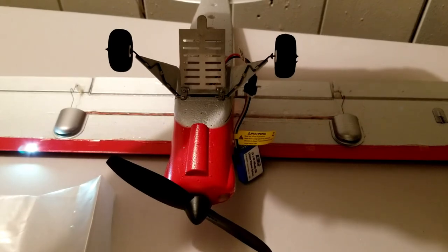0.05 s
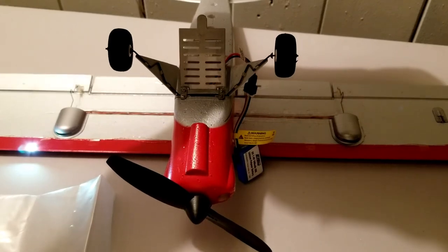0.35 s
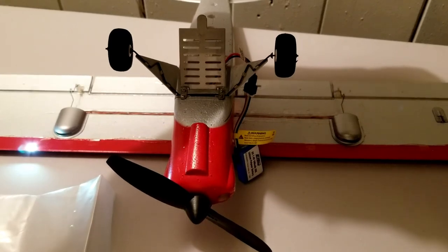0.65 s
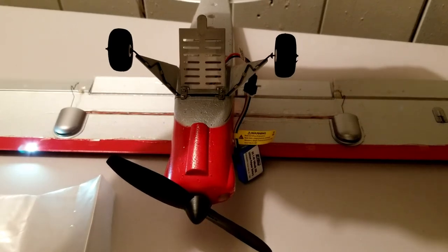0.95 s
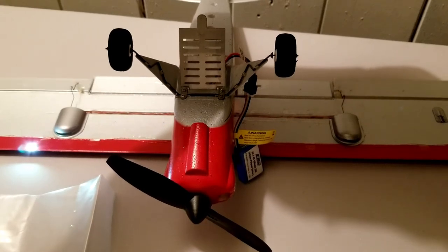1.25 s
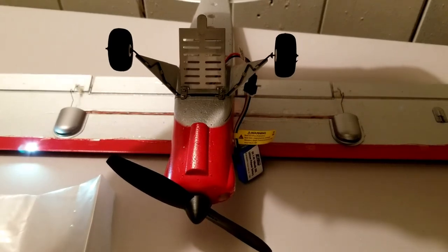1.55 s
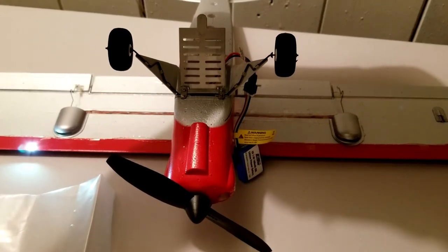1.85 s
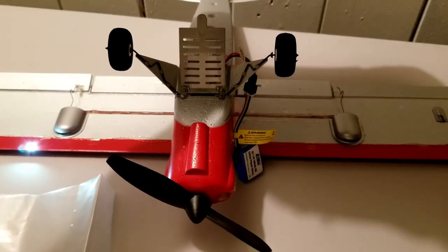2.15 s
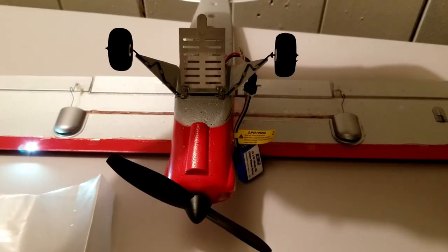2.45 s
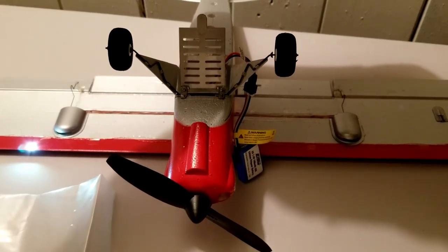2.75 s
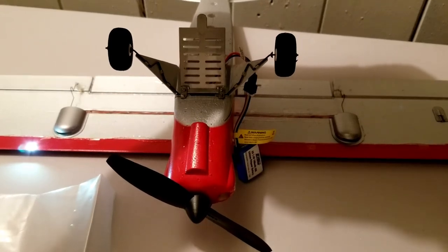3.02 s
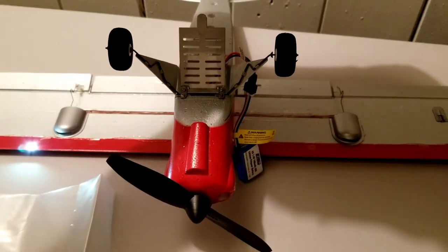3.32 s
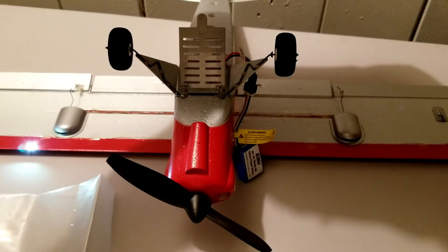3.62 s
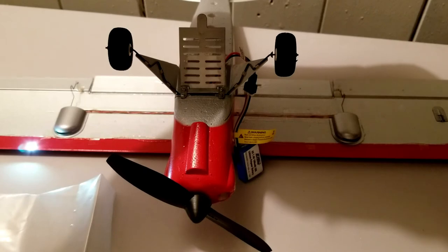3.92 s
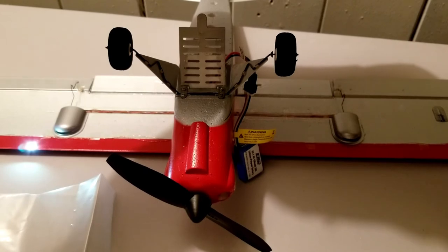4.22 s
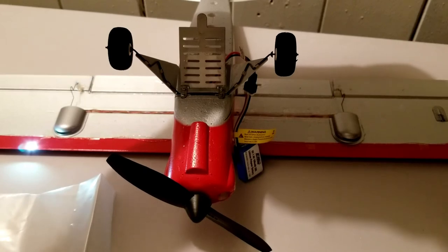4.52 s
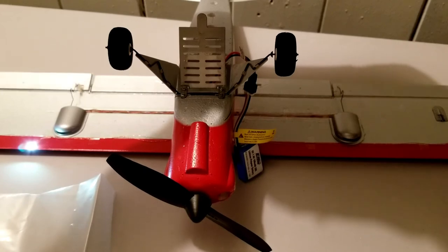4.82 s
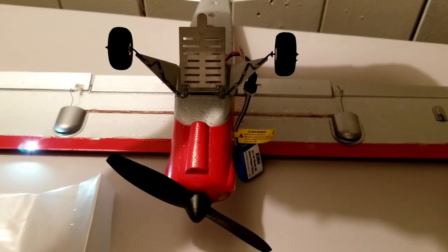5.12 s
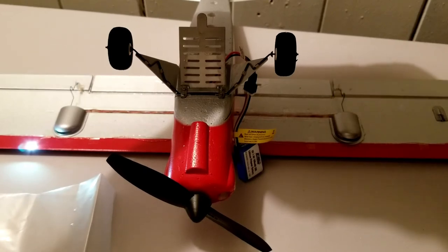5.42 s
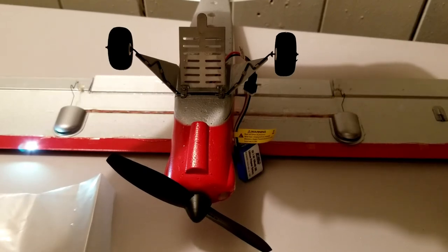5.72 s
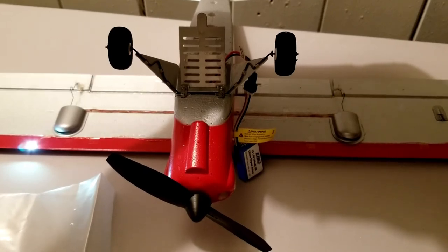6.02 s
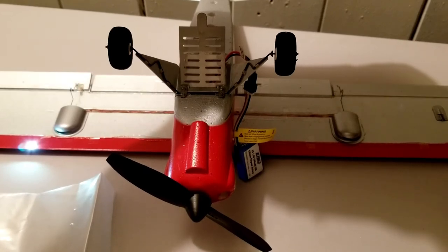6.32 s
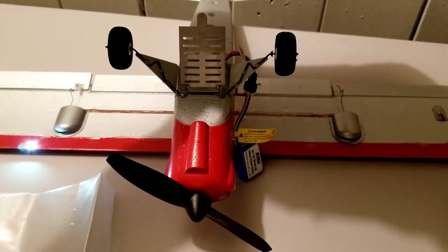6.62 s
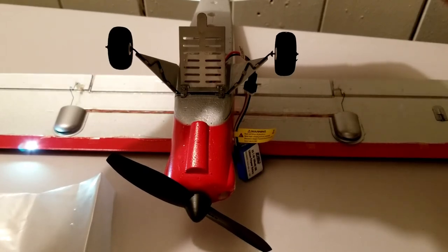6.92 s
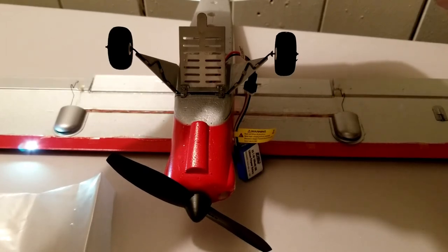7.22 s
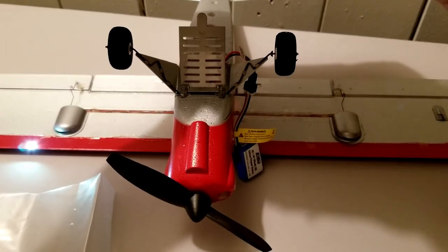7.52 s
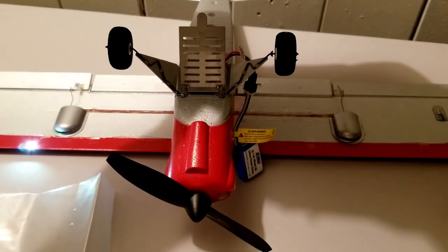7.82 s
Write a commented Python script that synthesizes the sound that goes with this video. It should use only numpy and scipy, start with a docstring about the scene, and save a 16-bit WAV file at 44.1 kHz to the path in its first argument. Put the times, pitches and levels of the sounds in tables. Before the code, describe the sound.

Small servos whirr and rattle on and off close by, moving a foam model plane's flaps back and forth indoors.

```python
"""Servos on a foam model plane

Tiny motors (servos) swing the plane's flaps to and fro, close to a phone in a small quiet room.
The radio receiver kicks each motor once per beat, or control frame: slow moves stutter, fast ones
merge into a buzz of plastic teeth. Each stroke speeds up, peaks and eases off; the brighter left servo
often leads. Loose gears and links clack in hard moves, and the foam wing hums with the motors."""
import sys
import numpy as np
from scipy import signal
from scipy.fft import rfft, irfft
from scipy.io import wavfile
from scipy.ndimage import uniform_filter1d

SR = 44100
rng = np.random.default_rng(int(sys.argv[2]) if len(sys.argv) > 2 else 0)


def waveform_to_disk(signal):
    """Save audio, clipped to [-1, 1], as 16-bit WAV at the path in sys.argv[1]."""
    frames = np.transpose(np.atleast_2d(signal))
    scaled = np.clip(frames, -1, 1) * 32767
    samples = np.round(scaled).astype(np.int16)
    wavfile.write(sys.argv[1], SR, samples)


N = 355047
TIME = np.arange(N) / SR
FRAME_HZ = 44.391  # control frames a second
TOP_HZ = 15900  # the phone cuts the sound above this
PAD_SAMPLES = SR // 1000  # spare time ahead of an echo pattern, to keep its start whole

# Swings of the flaps. Columns: start t/s, fastest t/s, gear level/dB, swell before the peak/dB,
# fade after it/dB, wing rumble level/dB, treble lift/dB, lead of the left servo/dB
STROKES = [(-.1, 0.008, -28.5, 1, 2, -47, 2, 3), (0.119, 0.189, -26, 2, 6, -47, -1, -1),
           (0.434, 0.496, -23.5, 4, 7, -46, -3, 2), (0.68, .80, -26.5, 2, 3, -46, -1, 0.5),
           (1.153, 1.292, -26.5, 4.5, 5.5, -47.5, -0.5, 2.5), (2.168, 2.37, -24, 4, 8, -46, -3.5, 2.5),
           (2.879, 3.11, -25.5, 7, 9, -44.5, -3, 1.5), (3.563, 3.681, -22, 11, 13, -46, -1.5, 0),
           (4.351, 4.524, -28, 4.5, 7, -47.5, -1, 2), (5.077, 5.2, -24, 4, 7, -47.5, -2, -0.5),
           (5.302, 5.37, -29, 2, 4, -52.5, -1, 0.5), (5.802, 5.991, -27, 6, 10, -47, -2.5, 2.5),
           (6.542, 6.68, -26.5, 6, 10, -50.5, -2.5, -1.5), (6.918, 7.06, -31.5, 4, 4, -58, -3.5, 1.5),
           (7.326, 7.442, -27.5, 6, 3.5, -47.5, 1, 2), (7.569, 7.73, -28.5, 1, 4.5, -50.5, -3, -1),
           (8.001, 8.042, -27, 1.5, 0, -60, -6.5, -0.5)]
# Runs of kicks as a servo creeps or settles.
# Columns: first t/s, number of kicks, frames apart, level/dB, change per kick/dB
CREEPS = [(.911, 2, 4, -28, -10), (1.113, 2, 1, -29, -3), (1.795, 2, 1, -27.5, -4), (1.990, 2, 4, -41, 10),
          (2.11, 2, 2, -26.5, -4), (2.823, 3, 1, -38.5, 4), (3.323, 2, 2, -33, -1),
          (3.928, 4, 1, -29.5, -3.5), (4.128, 2, 1, -36.5, -1.5), (4.197, 4, 1, -36.5, 0.18),
          (4.311, 2, 2, -35, 3), (4.812, 5, 1, -35, 1), (5.012, 3, 1, -36, -1), (5.55, 2, 2, -28.5, -6),
          (5.726, 4, 1, -43, 4), (6.498, 2, 1, -37, 0), (7.301, 1, 1, -47, 0), (7.332, 1, 1, -27.5, 0),
          (7.872, 2, 1, -28, -3.5), (7.944, 2, 3, -34.5, 9.5)]
# Pitches at which the servo cases and their mounts ring. Columns: f/Hz, width/Hz, lift/dB
CASE_RESONANCES = [(3210, 170, 3.5), (4730, 230, 1.5), (7750, 370, 2.3), (14200, 1100, 3)]


def gears(drive, treble_db, rumble_db, whirr_db, servos=4):
    """The servos take turns to be loudest, each one's teeth ringing its own part of the plane."""
    # Tone of the plastic gears. Columns: f/Hz, level/dB
    gear_colour = [(300, -37.5), (1000, -22), (1170, -12.5), (1750, -11), (2300, -7.5), (3200, -3.5),
                   (4400, 0.5), (5600, -0.5), (8000, -1.5), (9000, -4.5), (11300, -3), (12500, -3.5),
                   (15700, -5)]
    speed = motor_speed(drive)
    tooth_hz = 2300 * np.clip(speed / .03, .1, 2) ** .5
    shares = np.array([undb(9.1 * drift(12)) for _ in range(servos)])
    shares /= np.sqrt(np.sum(shares ** 2, axis=0))
    buzz = sum(radiate(share * speed * teeth(tooth_hz, scatter_db=11, rub=0.99),
                       ring_s=0.026, snap=0.57, width=5.7, left_db=3) for share in shares)
    buzz = colour(buzz, gear_colour, CASE_RESONANCES)
    buzz += radiate(undb(whirr_db) * whirr(speed), ring_s=0.0064, snap=1, width=0.87, left_db=3)
    # teeth that hit harder are brighter; a creeping motor hardly shakes the foam and sounds thin
    body_db = np.clip(0.28 * (rumble_db + 51.5), -8.5, 1.5)
    body = buzz - treble_of(buzz, 1700)
    return buzz + treble_of(buzz, 10100) * (undb(treble_db) - 1) + body * (undb(body_db) - 1)


def motor_speed(drive):
    """Each frame kicks the motors; the slower the move, the more speed they lose between kicks."""
    rise_s, coast_s = .0055, .007
    frame = TIME * FRAME_HZ - .4 + .05 * drift(30)
    drive_db = 20 * np.log10(drive + 1e-6)
    stutter_db = np.clip(2.6 - .3 * (drive_db + 31), 1.4, 6)
    speed = drive * undb(stutter_db * np.cos(2 * np.pi * frame) + 1.1 * drift(70) - 1.5)
    for at_s, db in on_frames(CREEPS):
        span = slice(max(0, int((at_s - .02) * SR)), int((at_s + .04) * SR))
        t = TIME[span] - at_s
        spin_up = np.clip(1 + t / rise_s, 0, 1) ** .9
        coast = np.exp(-np.abs(t / coast_s) ** 1.3)
        speed[span] = np.maximum(speed[span], undb(db) * np.where(t < 0, spin_up, coast))
    return speed


def teeth(tooth_hz, scatter_db, rub):
    """Gear teeth tick unevenly as they meet and hiss as their sides rub."""
    teeth_passed = np.cumsum(tooth_hz * (1 + .15 * drift(300))) / SR
    strength = undb(scatter_db * np.clip(rng.standard_normal(N), -2, 2))
    ticks = np.diff(np.floor(teeth_passed), prepend=0) * strength
    ticks /= np.sqrt(tooth_hz)  # slow teeth strike singly, fast ones share the load
    return unit(unit(ticks) + rub * rng.standard_normal(N))


def whirr(speed):
    """The small gear on the motor sings a rough, wandering tone that rises with speed."""
    wander = 1 + .035 * drift(25) + .02 * drift(700)
    pitch_hz = 4650 * np.clip(speed / .03, .3, 2) ** .08 * wander
    return speed * unit(undb(4 * drift(40)) * np.sin(2 * np.pi * np.cumsum(pitch_hz) / SR))


def strokes():
    """Each stroke swells, then fades and dulls. Gives on/off, gear level, treble lift and rumble level."""
    # Moments when the motors stop; other strokes run straight into the next. Column: t/s
    stops = [.38, .89, 1.755, 2.575, 3.25, 3.93, 4.82, 5.525, 6.288, 7.178, 7.858, 8.2]
    rows, stops = np.array(STROKES), np.array(stops)
    starts = rows[:, 0]
    next_stops = stops[np.searchsorted(stops, rows[:, 1])]
    ends = np.minimum(next_stops, np.append(starts[1:], stops[-1]))
    current = np.maximum(np.searchsorted(starts, TIME) - 1, 0)
    start, fastest, peak_db, swell_db, fade_db, wing_db, bright_db, _ = rows[current].T
    to_come = np.clip((fastest - TIME) / (fastest - start), 0, 1)
    ease = np.clip((TIME - fastest) / (ends[current] - fastest), 0, 1)
    moving = np.clip(uniform_filter1d((TIME <= ends[current]) * 1., size=300), 0, 1)
    gear_db = peak_db - swell_db * to_come - fade_db * ease ** .7  # falls fastest just after the peak
    treble_db = bright_db - 6.5 * ease
    rumble_db = wing_db - 3.6 * swell_db * to_come ** 2 - 13 * ease
    return moving, gear_db, treble_db, rumble_db


def left_lead(lead_s=.2):
    """How far the left servo leads around the start of each stroke, in dB."""
    return sum(lead_db * np.exp(-((TIME - start) / lead_s) ** 2) for start, *_, lead_db in STROKES)


def stray_clacks(drive, per_second=20):
    """Times and levels of clacks that come at random while the gears turn, louder with more effort."""
    draws = rng.random((round(per_second * N / SR), 2))
    samples = (draws[:, 0] * N).astype(int)
    return [(TIME[i], 20 * np.log10(drive[i]) + 2 + extra_db)
            for i, extra_db in zip(samples, draws[:, 1]) if drive[i] > .01]


def slack_clacks(drive, links=3):
    """Loose gears and links snap tight with a sharp tick; the teeth chatter briefly around it."""
    # Runs of clacks. Columns: first t/s, number of clacks, frames apart, level/dB, change per clack/dB
    rattles = [(.134, 3, 2, -15, -3), (.468, 3, 1, -15, 0), (.558, 2, 1, -19, 4), (.954, 1, 1, -21, 0),
               (2.181, 7, 1, -13.5, -.4), (2.338, 3, 1, -12.5, -1.5), (3.072, 4, 2, -13, -2.5),
               (3.577, 1, 1, -20, 0), (3.624, 3, 1, -13.5, 1.5), (3.688, 3, 1, -11.5, -3),
               (4.544, 2, 2, -20, 0), (5.086, 4, 1, -15, -.3), (5.178, 3, 1, -13, -1),
               (5.994, 3, 2, -16, .4), (6.552, 4, 3, -19, 0), (7.611, 2, 6, -18, -2), (8.035, 1, 1, -15, 0)]
    # Tone of a clack. Columns: f/Hz, level/dB
    clack_colour = [(300, -29), (980, -26), (1250, -9.5), (2200, -11), (3200, -2), (8000, 5), (9800, 3),
                    (15700, 1.5)]
    # the first kick of a creep takes up the slack with a faint tick
    take_ups = [(first_s - .003, min(db, -33)) for first_s, _, _, db, _ in CREEPS]
    forces = np.zeros((links, N + SR))
    for k, (at_s, db) in enumerate(on_frames(rattles) + take_ups + stray_clacks(drive)):
        at_s = max(at_s + .0008 * rng.standard_normal(), .01)  # a little early or late
        offsets, sizes = rng.standard_normal((2, 14))
        offsets[0], sizes[0] = 0, 2.5  # the main tick
        sizes *= undb(db) * np.sqrt(0.0021 * SR / np.sum(sizes ** 2))
        ticks_s = at_s - .0004 + .0013 * offsets
        np.add.at(forces[k % links], (ticks_s * SR).astype(int), sizes)
    knocks = sum(radiate(force[:N], ring_s=0.018, snap=0.75, width=2, left_db=2.2) for force in forces)
    return colour(knocks, clack_colour, CASE_RESONANCES)


def wing_rumble(strength, panels=3):
    """The motors shake the foam panels into a rough rumble."""
    # Tone of the foam wing. Columns: f/Hz, level/dB
    wing_colour = [(40, -25.5), (110, -13), (155, -5.5), (215, -14.5), (275, -5.5), (335, -8), (410, -4.5),
                   (520, -5), (640, -5.5), (1100, -12.5), (2000, -14.5)]
    shake = sum(radiate(strength * undb(1.5 * drift(40)) * rng.standard_normal(N),
                        ring_s=0.024, snap=1, width=1, left_db=2) for _ in range(panels))
    return undb(-7.5) * colour(shake, wing_colour)


def shaft_whine():
    """At full speed a motor's shaft makes the wing hum with a wavering tone that sags in pitch."""
    # Moments of full speed. Columns: middle t/s, shaft f/Hz, level/dB, half length/s
    whines = [(0.216, 626, -56.5, 0.047), (.77, 495, -49.5, 0.047), (1.287, 676.6, -49, 0.02),
              (2.42, 623, -49.5, 0.025), (3.086, 683.7, -43.5, 0.057), (3.683, 673.3, -45.5, 0.031),
              (5.195, 636.4, -51, 0.022), (6.052, 641, -47.5, 0.065), (7.445, 512, -49, 0.032)]
    sag_per_s, surge_db = 0.393, 7
    waver = 1 + .04 * drift(120)
    flutter = undb(3 * drift(100))
    surge = undb(surge_db * (np.cos(np.pi * (TIME * FRAME_HZ - .2)) - .5))  # on every second frame
    tone = np.zeros(N)
    for at_s, hz, db, half_s in whines:
        span = slice(max(0, int((at_s - .2) * SR)), int((at_s + .2) * SR))
        t = TIME[span] - at_s
        turns = np.cumsum(hz * waver[span] * (1 - sag_per_s * t)) / SR
        swell = undb(db) * np.exp(-(t / half_s) ** 2)
        tone[span] += swell * flutter[span] * surge[span] * np.sin(2 * np.pi * turns)
    return radiate(tone, ring_s=0.0024, snap=4.8, width=0.66, left_db=4.5)


def radiate(x, ring_s, snap, width, left_db):
    """A sound rings the plane's body, then the room, and reaches two microphones. Snap is its dry part."""
    echo_s, treble_echo_s, room_db = .36, .255, -8.5  # the times are for a fade of 60 dB
    t = TIME[:SR // 2]
    ring = rng.standard_normal((3, len(t))) * undb(-60 * t / ring_s)
    ring /= np.sqrt(np.sum(ring ** 2, axis=1, keepdims=True))
    ring[0, 0] += snap
    direct = flatten(ring[0] + width * ring[1:])
    # the walls answer a few milliseconds later and swallow the treble first
    walls = rng.standard_normal((2, len(t)))
    high = treble_of(walls, 3100)
    echo = (walls - high) * undb(-60 * t / echo_s) + high * undb(-60 * t / treble_echo_s)
    echo *= np.clip(t / 0.005, 0, 1)
    response = direct + undb(room_db) * flatten(echo)
    heard = signal.fftconvolve(x[None], response, axes=1)[:, PAD_SAMPLES:N + PAD_SAMPLES]
    return heard * undb([[left_db], [-left_db]])


def room_hum():
    """The faint low hum of a quiet room."""
    # Tone of the room's noise. Columns: f/Hz, level/dB
    air_colour = [(25, -7), (60, -1.5), (120, -2), (200, -9.5), (500, -21), (16000, -27)]
    noise = rng.standard_normal((3, N))
    stereo = unit(noise[0] + 0.85 * noise[1:])
    return undb(-76.5) * colour(stereo, air_colour) * undb([[1.5], [-1.5]])


def on_frames(runs):
    """Time and level of every beat in runs that keep step with the control frames."""
    return [(first_s + k * round(apart) / FRAME_HZ, db + k * change_db)
            for first_s, count, apart, db, change_db in runs for k in range(round(count))]


def colour(x, points, resonances=()):
    """Shape a sound's tone with a smooth curve and a few ringing peaks."""
    size = 8192
    f = np.arange(size // 2 + 1) * SR / size
    hz, db = np.transpose(points)
    gain_db = np.interp(np.log(f + 1), np.log(hz), db)
    for centre, width, lift in resonances:
        gain_db += lift / (1 + (2 * (f - centre) / width) ** 2)
    # make the filter ring only after a hit, never before it
    cepstrum = irfft(np.log(undb(gain_db)))
    cepstrum[1:size // 2] *= 2
    cepstrum[size // 2 + 1:] = 0
    response = irfft(np.exp(rfft(cepstrum)))
    power = np.sum(undb(gain_db[f < TOP_HZ]) ** 2) / len(f)
    return signal.fftconvolve(x, response[None] / np.sqrt(power), axes=1)[:, :N]


def flatten(response):
    """Even out the broad tone of an echo pattern and keep its fine peaks."""
    spectrum = rfft(response)
    power = uniform_filter1d(uniform_filter1d(np.abs(spectrum) ** 2, size=200), size=200)
    return np.roll(irfft(spectrum / np.sqrt(power)), PAD_SAMPLES, axis=-1)[:, :-SR // 10]


def treble_of(x, hz):
    """The part of a sound above hz, in step with the rest."""
    return signal.sosfiltfilt(signal.butter(2, hz, "high", fs=SR, output="sos"), x)


def drift(rate_hz):
    """A smooth random wander with a typical size of 1."""
    step = max(2, int(SR / rate_hz))
    stairs = np.repeat(rng.standard_normal(N)[:N // step + 1], step)
    return unit(uniform_filter1d(stairs, step)[:N])


def undb(db):
    """Turn decibels into a volume factor."""
    return 10 ** (np.asarray(db) / 20)


def unit(x):
    """Scale to an average (rms) level of 1."""
    return x / np.sqrt(np.mean(x ** 2))


def scene():
    """Servos, wing and loose links in the room."""
    moving, gear_db, treble_db, rumble_db = strokes()
    drive = moving * undb(gear_db)
    lead_db = left_lead()  # a leading left servo adds treble and whirr and pulls the buzz left
    servos = gears(drive, treble_db + 0.49 * lead_db, rumble_db, whirr_db=-18 + 1.9 * lead_db)
    servos *= undb([0.33 * lead_db, -lead_db])
    wing = wing_rumble(moving * undb(rumble_db)) + shaft_whine()
    return servos + wing + room_hum() + slack_clacks(drive)


def record(dry):
    """The phone cuts off the highest treble."""
    return signal.sosfilt(signal.ellip(10, .2, 70, TOP_HZ, fs=SR, output="sos"), dry)


dry = scene()
out = record(dry)
waveform_to_disk(out)
```